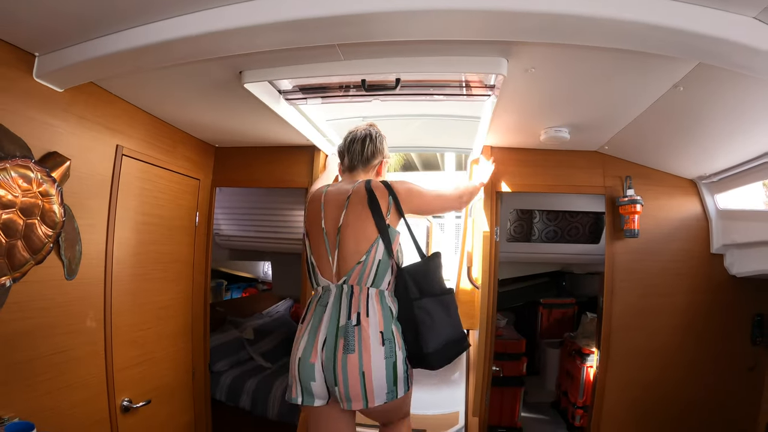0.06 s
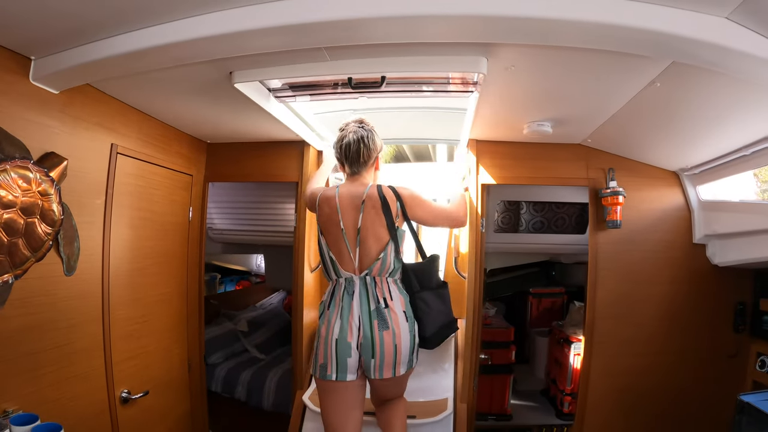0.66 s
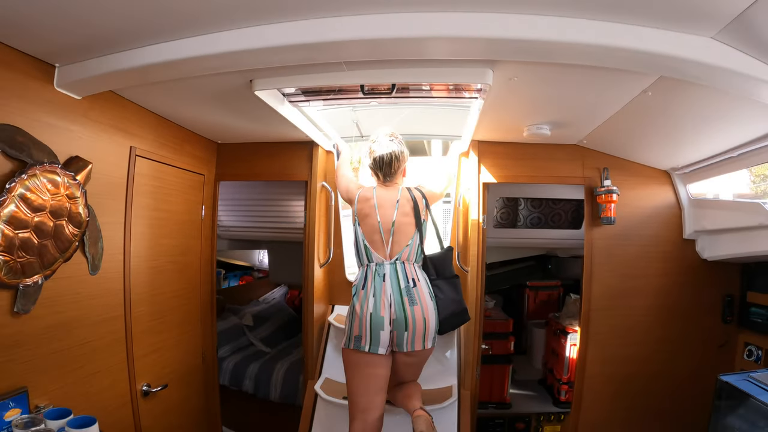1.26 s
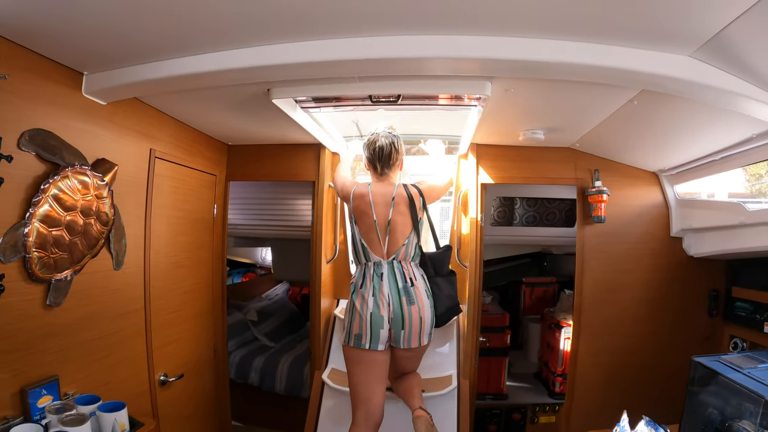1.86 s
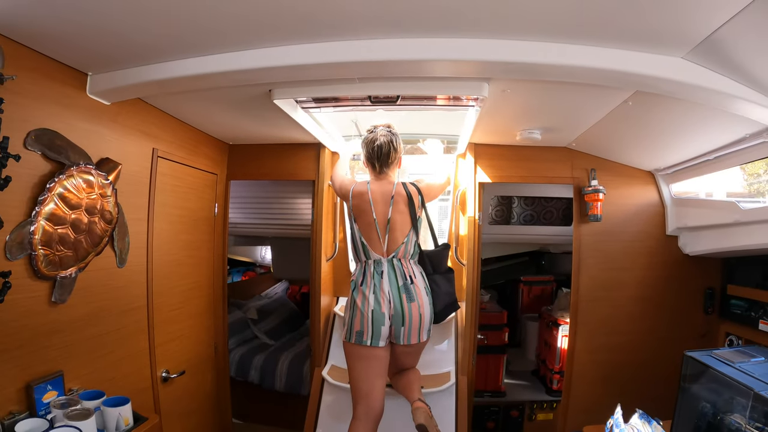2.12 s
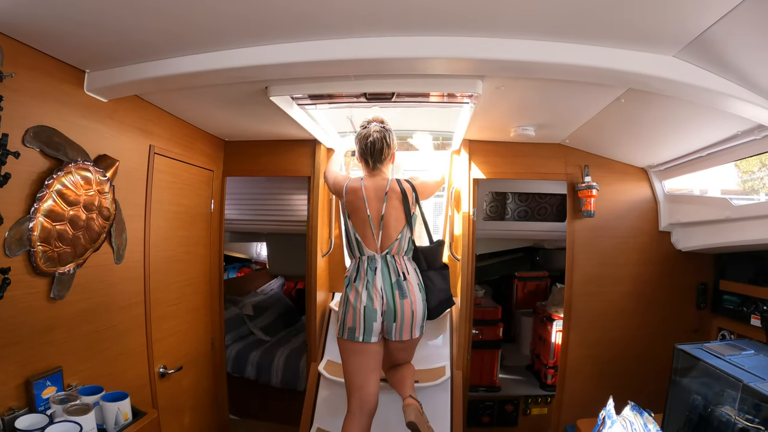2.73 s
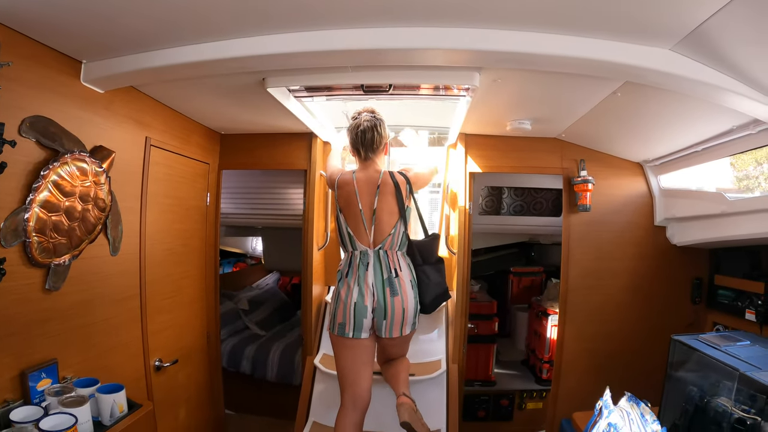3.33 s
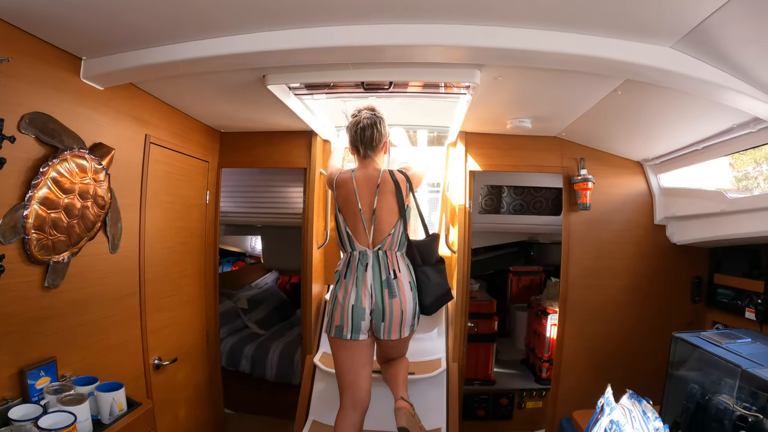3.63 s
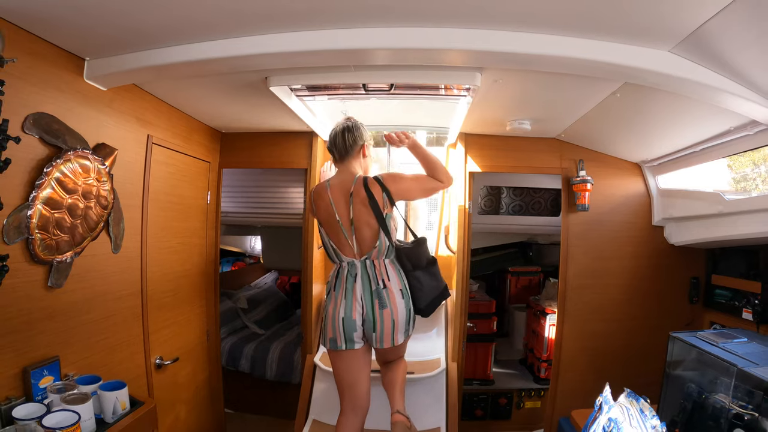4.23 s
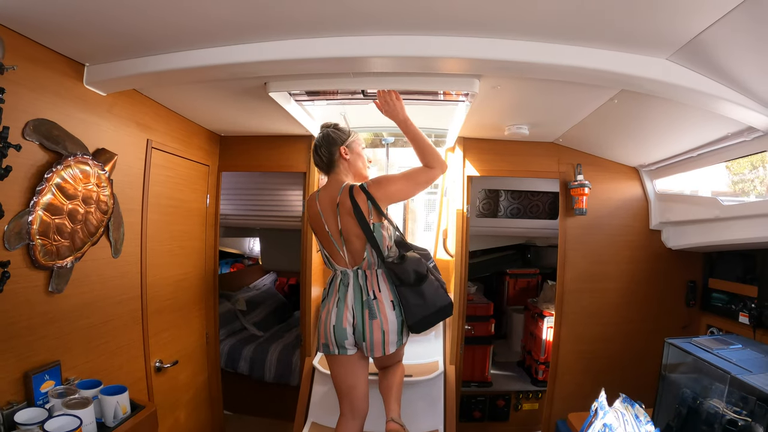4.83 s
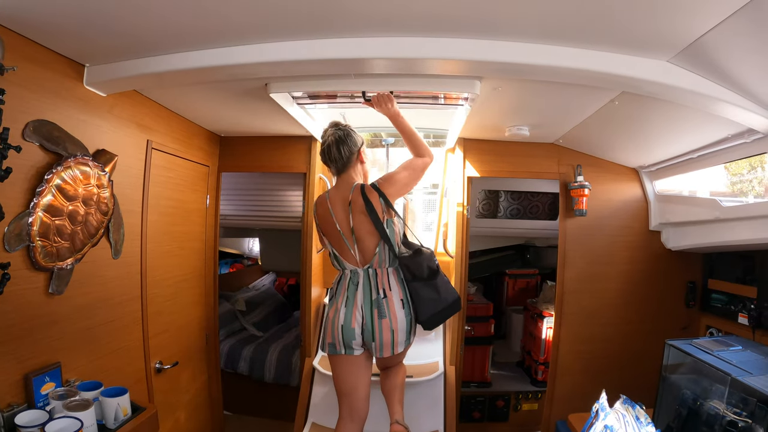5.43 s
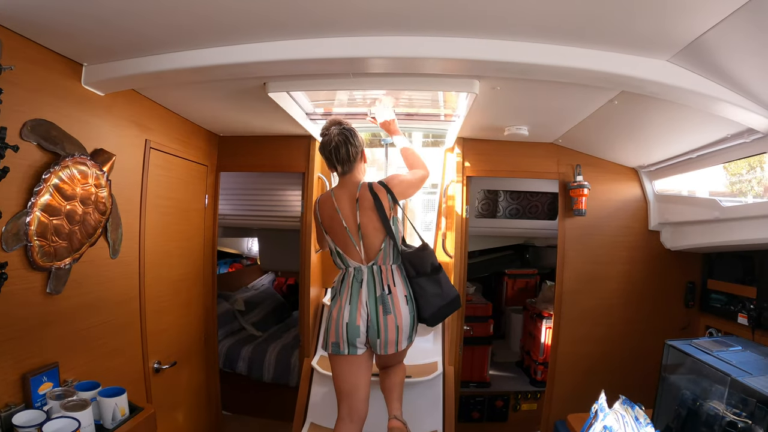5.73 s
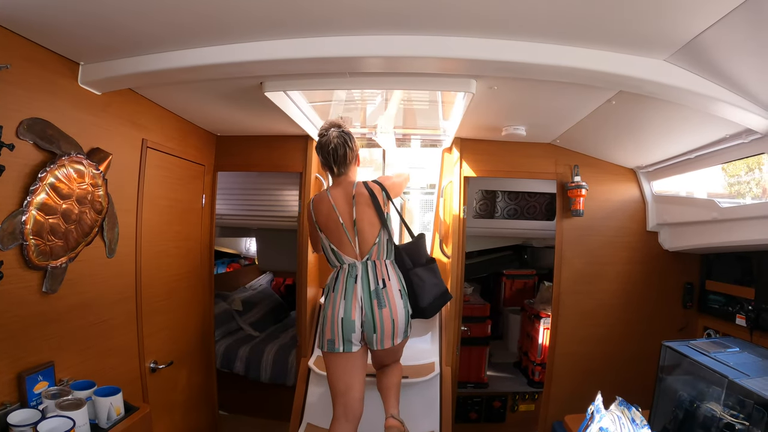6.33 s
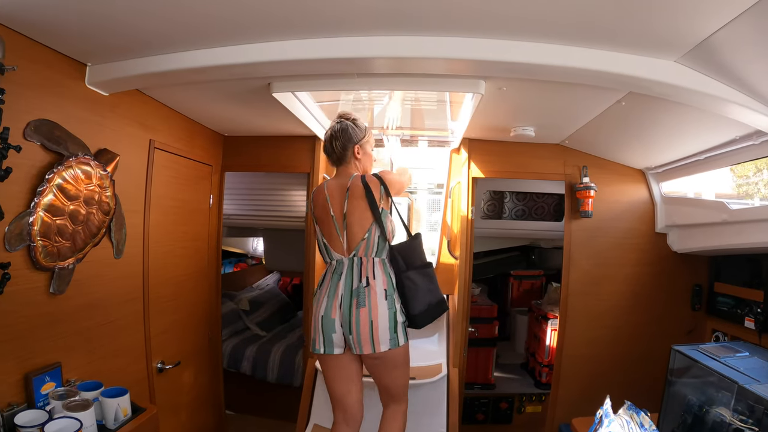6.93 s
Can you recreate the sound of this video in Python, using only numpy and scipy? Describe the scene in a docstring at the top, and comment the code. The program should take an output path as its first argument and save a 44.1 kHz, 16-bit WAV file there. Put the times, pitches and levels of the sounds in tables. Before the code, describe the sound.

Light clicks, a wooden knock and a rattling latch, then a sliding hatch bangs twice inside a small boat cabin.

```python
"""Steps and hatch in a sailboat cabin

One microphone inside a small wooden cabin, at close quarters. Someone climbs the companionway and works
the hatch overhead: steps tick, a board knocks, the latch clicks and rattles, and the sliding hatch bangs
twice against its stops. Every blow dies quickly in the cramped space, over a soft hollow drone that
the recorder's gain control turns down after each thump."""
import sys
import numpy as np
from scipy import signal
from scipy.fft import rfft, irfft, next_fast_len
from scipy.io import wavfile
from scipy.ndimage import uniform_filter1d, minimum_filter1d

SR = 44100
rng = np.random.default_rng(int(sys.argv[2]) if len(sys.argv) > 2 else 0)


def waveform_to_disk(signal):
    """Save audio, clipped to [-1, 1], as 16-bit WAV at the path in sys.argv[1]."""
    frames = np.transpose(np.atleast_2d(signal))
    scaled = np.clip(frames, -1, 1) * 32767
    samples = np.round(scaled).astype(np.int16)
    wavfile.write(sys.argv[1], SR, samples)


N = 307377
BLOW_S = .4   # length of one blow with its reflections

# spectrum of the board, scuffed or knocked: (frequency [Hz], level [dB])
BOARD_SPECTRUM = [(25, -31), (55, -20), (80, -7.5), (135, 4.5), (180, -3), (300, 0.5), (450, -4.5),
                  (750, -10), (950, -17.5), (1400, -15.5), (2900, -21.5), (4200, -32), (6000, -42.5),
                  (9500, -67), (13500, -73)]


def from_db(db):
    """Decibels to gain."""
    return 10 ** (np.asarray(db) / 20)


def unit_power(x):
    """Scale to a mean square of one."""
    return x / np.sqrt(np.mean(x ** 2) + 1e-20)


def at_level(sound, db):
    """Give a blow the energy of 30 ms at this level."""
    return from_db(db) * unit_power(sound) * np.sqrt(.03 / BLOW_S)


def at_hz(points, hz):
    """Read a table on a log-frequency axis."""
    frequencies, values = np.array(points).T
    return np.interp(np.log(hz + 1e-3), np.log(frequencies), values)


def add(track, s, sound):
    """Mix a sound in from time s."""
    start = round(s * SR)
    track[start:start + len(sound)] += sound[:N - start]


def low_cut(x, edge_hz, order=2):
    """Roll off the bass below the edge."""
    return signal.sosfilt(signal.butter(order, edge_hz, "high", fs=SR, output="sos"), x)


def coloured(x, spectrum, rings=(), tilt=0):
    """Filter by a body's smooth spectrum, a tilt in dB per octave and resonances that stand out."""
    size = 2 * next_fast_len(len(x) // 2 + 1)
    hz = np.arange(size // 2 + 1) * SR / size
    db = at_hz(spectrum, hz) + tilt * np.log2(np.clip(hz, 100, 6000) / 1000)
    for centre, width, lift in rings:
        db = db + lift / (1 + ((hz - centre) / width) ** 2)
    # minimum phase, so nothing rings before it is struck
    cepstrum = irfft(np.log(from_db(db)))
    cepstrum[1:size // 2] *= 2
    cepstrum[size // 2 + 1:] = 0
    return irfft(rfft(x, size) * np.exp(rfft(cepstrum)))[:len(x)]


def noise(spectrum, rings=(), tilt=0):
    """Steady unit-power noise through a body's spectrum and resonances."""
    return unit_power(coloured(rng.standard_normal(N), spectrum, rings, tilt))


def reflections():
    """Random reflections from one spot to the microphone, rippled by small resonances of the joinery."""
    spacing_hz = 69.8
    size = round(BLOW_S * SR)
    hz = np.arange(size // 2 + 1) / BLOW_S
    ripple = np.interp(hz / spacing_hz, np.arange(400), np.clip(rng.standard_normal(400), -2, 2))
    ripple_db = 2.5 * ripple * hz / (hz + 800)
    return irfft(rfft(rng.standard_normal(size)) * from_db(ripple_db), size)


def nearby(path, share=.65):
    """Repeated blows on one object have a share of their reflections in common."""
    return np.sqrt(share) * path + np.sqrt(1 - share) * reflections()


def impact(path, crack_db, crack_s, echo_db, decay_scale):
    """A blow at the microphone: the direct crack, a near wall's echo, then dense dying reflections."""
    # the cabin's decay, before decay_scale: (frequency [Hz], t60 [s])
    cabin_decay = [(60, 0.15), (200, 0.16), (600, 0.22), (2000, 0.2), (5000, .17), (12000, 0.13)]
    t = np.arange(len(path)) / SR
    hz = np.arange(len(t) // 2 + 1) * SR / len(t)
    since_echo = t - .0175
    crack = from_db(crack_db) * np.exp(-(t / crack_s) ** 2)
    echo = from_db(echo_db) * (since_echo > 0) * np.exp(-(since_echo / crack_s) ** 2)
    path_spectrum, out = rfft(path), 0
    edges = np.r_[20, np.geomspace(120, 15000, 12)]
    for low, high in zip(edges, edges[1:]):
        band = irfft(path_spectrum * (hz >= low) * (hz < high), len(t))
        t60 = decay_scale * at_hz(cabin_decay, np.sqrt(low * high))
        envelope = crack + echo + from_db(-60 * t / t60)
        out = out + np.sqrt(high - low) * unit_power(band * envelope)
    return out * (1 - np.exp(-t / .00047))


def struck(touches, spectrum, rings, high_hz, width_hz, crack_db, decay_scale):
    """A small part touches and rings briefly; each touch sets the strength of its high ring."""
    out, path = np.zeros(N), reflections()
    for s, db, lift_db, tilt in touches:
        hit = impact(nearby(path), crack_db, crack_s=.0032, echo_db=-21, decay_scale=decay_scale)
        ringing = coloured(hit, spectrum, rings + [(high_hz, width_hz, lift_db)], tilt)
        add(out, s, at_level(ringing, db))
    return out


def rebounds(blows, dulling, count):
    """Each blow becomes an even run of hits, each weaker and duller by `dulling` dB per octave."""
    return [(s + k * gap_s, db - k * loss_db, tilt - k * dulling)
            for s, db, tilt, gap_s, loss_db in blows for k in range(count)]


def panel(blows, spectrum, modes, modes_db, noise_db, decay_scale):
    """A heavy panel strikes and rebounds in step with its bending modes, so every blow feeds them."""
    # the thud gives way to the modes in the bass: (frequency [Hz], gain [dB])
    room_for_modes = [(100, -1), (160, -6), (600, -5), (2500, 0)]
    out, path = np.zeros(N), reflections()
    t = np.arange(len(path)) / SR
    onset = 1 - np.exp(-(t / .004) ** 2)
    first_s = blows[0][0]
    for s, db, tilt in blows:
        hit = impact(nearby(path), crack_db=-6.5, crack_s=.0043, echo_db=-18.5, decay_scale=decay_scale)
        thud = at_level(coloured(hit, spectrum, tilt=tilt), noise_db)
        sound = coloured(thud, room_for_modes)
        for k, (hz, mode_db, t60) in enumerate(modes):
            swing = np.sin(2 * np.pi * hz * (t + s - first_s)) * from_db(-60 * t / t60) * onset
            sound = sound + (-1) ** k * from_db(modes_db + mode_db + tilt * np.log2(hz / 600)) * swing
        add(out, s, from_db(db) * sound)
    return out


def drone():
    """Room tone: the steady, hollow background noise of the boat."""
    # broad shape of the drone: (frequency [Hz], level [dB])
    spectrum = [(25, -60), (64, -22), (102, -15), (130, -12), (200, -3.5), (300, -6.5), (370, -3),
                (510, -8), (740, -14), (950, -16.5), (2400, -23), (4800, -30.5), (6100, -38), (8000, -49.5),
                (9400, -65.5), (11200, -53), (14000, -68)]
    # its hollow resonances: (frequency [Hz], width [Hz], lift [dB])
    rings = [(130.5, 8.5, 10), (198.3, 4.3, 7), (275.8, 11.6, 11.5), (339, 8.2, 8), (451, 1.5, 11),
             (527.7, 7.6, 10), (692, 3.1, 15.5), (850, 3.2, 11), (1695, 5.8, 3.5), (4850, 130, 1)]
    return from_db(-46.4) * noise(spectrum, rings)


def woodwork_clicks():
    """Steps and hatch frame click drily, each spot with two rings of its own."""
    # clicks: (time [s], level [dB], main ring [Hz], second ring [Hz], its lift [dB], tilt [dB/octave])
    clicks = [(0.567, -49.5, 6140, 4170, 12, 4.5), (1.611, -58.5, 1300, 4160, 18, -1.5),
              (1.666, -50.5, 1240, 4170, 18, -3.5), (3.911, -45, 1535, 4100, 7, -6.5),
              (3.9924, -27.5, 1796, 4900, 2.5, -.5), (5.2007, -27, 3100, 4430, 12.5, -1),
              (5.2665, -45, 1300, 4500, 23, -5), (5.3054, -34.8, 3200, 4460, 8, 2.3)]
    # the woodwork's spectrum: (frequency [Hz], level [dB])
    spectrum = [(100, -25.5), (400, -15), (800, -1), (1500, 3.5), (2800, 0.5), (5200, -4.5), (6100, -13.5),
                (7300, -22), (8500, -39), (9400, -38), (10600, -30), (13000, -66)]
    out, main_lift_db = np.zeros(N), 12
    for s, db, main_hz, second_hz, second_lift_db, tilt in clicks:
        hit = impact(reflections(), crack_db=5, crack_s=.003, echo_db=-2.5, decay_scale=1)
        rings = [(main_hz, .055 * main_hz, main_lift_db), (second_hz, .058 * second_hz, second_lift_db)]
        add(out, s, at_level(coloured(hit, spectrum, rings, tilt), db))
    return out


def tread():
    """A companionway tread snaps under the foot, with a quick echo off the near wall."""
    # the snap and, last, its echo: (time [s], level [dB], high ring lift [dB], tilt [dB/octave])
    snap_and_echo = [(1.2898, -29.5, 3, 1.5), (1.2922, -39, 12, 0.5), (1.3078, -37.5, 8, 4.5)]
    # the tread's spectrum: (frequency [Hz], level [dB])
    spectrum = [(100, -30), (500, 4), (1100, 3.5), (1400, -8), (1700, -4), (2100, -0.5), (3200, -8),
                (5000, -2), (6200, -17), (8600, -30), (9400, -50), (10400, -47), (13000, -60)]
    # its resonances: (frequency [Hz], width [Hz], lift [dB])
    rings = [(1035, 73, 9), (1280, 100, 9), (2430, 140, 2.5), (4120, 130, 9), (7100, 140, 12)]
    return struck(snap_and_echo, spectrum, rings, high_hz=5300, width_hz=150, crack_db=6, decay_scale=.82)


def rustle():
    """Clothes and a bag brush faintly in short soft swells."""
    # swells: (peak time [s], level [dB], half length [s], tilt [dB/octave])
    swells = [(2.15, -71, .14, 6), (6.86, -64.5, .08, -1)]
    # the fabric's spectrum: (frequency [Hz], level [dB])
    spectrum = [(1000, -14), (3000, -7), (5600, 4), (9000, -19), (11500, -12), (14000, -32)]
    t, out = np.arange(N) / SR, 0
    for s, db, half_s, tilt in swells:
        out = out + from_db(db) * np.exp(-((t - s) / half_s) ** 2) * noise(spectrum, tilt=tilt)
    return out


def board_scuff():
    """A board takes hold and rubs harder and harder until it seats."""
    seat_s, rise_s, fall_db_per_s = 2.553, .024, 1700
    age = np.arange(N) / SR - seat_s
    pressure = np.clip(1 + age / rise_s, 0, 1) ** 1.5
    release = from_db(-fall_db_per_s * np.maximum(age, 0))
    return from_db(-21) * pressure * release * noise(BOARD_SPECTRUM, tilt=2.6)


def board_knock():
    """The board knocks home in two runs of rebounds."""
    # knocks: (time [s], level [dB], tilt [dB/octave], rebound gap [s], loss per rebound [dB])
    knocks = [(2.5510, -18.8, 2.3, .0174, 3.8), (2.559, -20.5, -1.5, .009, 3.5)]
    # the board's bending modes: (frequency [Hz], level [dB], t60 [s])
    modes = [(81, -5.5, 0.11), (136.2, 1, 0.095), (198.5, -9, 0.12), (245, -6.5, 0.11), (307, -8, 0.098),
             (458, -22, 0.11), (770, -9, 0.074), (1400, -20, 0.12), (1890, -16, 0.17)]
    hits = rebounds(knocks, dulling=.1, count=4)
    return panel(hits, BOARD_SPECTRUM, modes, modes_db=-3, noise_db=2.6, decay_scale=.85)


def hatch_slide():
    """Pushed overhead, the hatch gathers speed, runs and slows by friction; rumble and hiss follow."""
    # pushes: (start [s], time at full speed [s], rumble level [dB], hiss level [dB])
    pushes = [(3.29, 0.47, -42.5, -55), (5.15, .13, -38.5, -49.5)]
    # rumble of the moving hatch: (frequency [Hz], level [dB])
    rumble_spectrum = [(50, -30.5), (130, -5.5), (280, -3), (500, -8.5), (900, -18.5), (2000, -37),
                       (8000, -64)]
    # hiss of its rubbing: (frequency [Hz], level [dB])
    hiss_spectrum = [(200, -21), (800, -6.5), (2400, -1), (4000, -10.5), (6000, -19), (9000, -42.5),
                     (14000, -56)]
    rise_s, coast_db_per_s = .37, 19
    t, rumble_gain, hiss_gain = np.arange(N) / SR, 0, 0
    for s, run_s, rumble_db, hiss_db in pushes:
        coasting_s = np.maximum(t - s - rise_s - run_s, 0)
        speed = np.clip((t - s) / rise_s, 0, 1) * from_db(-coast_db_per_s * coasting_s)
        rumble_gain = rumble_gain + from_db(rumble_db) * speed
        hiss_gain = hiss_gain + from_db(hiss_db) * speed ** 1.15
    return rumble_gain * noise(rumble_spectrum) + hiss_gain * noise(hiss_spectrum)


def latch():
    """The latch ticks lightly and its spring rings."""
    # ticks: (time [s], level [dB], spring ring lift [dB], tilt [dB/octave])
    ticks = [(3.3005, -32.5, 10, 0.5), (3.309, -39.5, 9, -2), (3.383, -43.5, 16, -1.5), (3.609, -43, 3, -3),
             (3.652, -43, 16, -4.5), (6.081, -55, 22, 5)]
    # the latch's spectrum: (frequency [Hz], level [dB])
    spectrum = [(300, -16), (900, -3), (1500, -6), (4000, -1.5), (4650, -23), (5600, -5.5), (7500, -22.5),
                (9200, -40), (10500, -27), (12000, -34), (14000, -64)]
    # its resonances: (frequency [Hz], width [Hz], lift [dB])
    rings = [(1470, 99, 10), (2400, 250, 12), (3410, 430, 9), (3710, 310, 1)]
    return struck(ticks, spectrum, rings, high_hz=5320, width_hz=170, crack_db=-18, decay_scale=.96)


def bolt():
    """The bolt rattles through its guide: uneven touches swell quickly, then die away and grow duller."""
    # the bolt's spectrum: (frequency [Hz], level [dB])
    spectrum = [(120, -46), (400, -14), (1000, -1), (2000, -4.5), (3500, -1), (5000, -3), (6500, -13.5),
                (9500, -37), (11500, -29.5), (12800, -40), (14500, -71)]
    # its resonances: (frequency [Hz], width [Hz], lift [dB])
    rings = [(1010, 98, 14), (1775, 100, 10), (2040, 69, 11), (2530, 110, 10.5), (2900, 93, 9.5),
             (3610, 130, 7.5)]
    start_s, gap_s, count = 3.730, .008, 9
    peak_db, rise_db, rise_s, fall_db_per_s = -22.5, 10, .016, 330
    spring_db, tilt_per_s = 17, -65
    ages = gap_s * (np.arange(count) + rng.uniform(-.151, .1484, count))
    swell_db = -rise_db * np.maximum(1 - ages / rise_s, 0)
    levels_db = peak_db + swell_db - fall_db_per_s * np.maximum(ages - rise_s, 0)
    touches = [(start_s + age, db, spring_db, tilt_per_s * age) for age, db in zip(ages, levels_db)]
    return struck(touches, spectrum, rings, high_hz=4670, width_hz=190, crack_db=2, decay_scale=1.04)


def hatch_open():
    """The hatch grazes its open stop, hits it and falls back."""
    # blows: (time [s], level [dB], tilt [dB/octave], rebound gap [s], loss per rebound [dB])
    blows = [(5.4142, -16.5, 5.5, .012, 14), (5.4225, -6.5, 0, .0152, 7.5), (5.4735, -11.5, -.3, .0295, 5)]
    # thud against the stop: (frequency [Hz], level [dB])
    spectrum = [(25, -64), (55, -42), (90, -21.5), (160, -1.5), (240, -2), (400, -8.5), (520, -9.5),
                (700, -18.5), (1000, -28.5), (2000, -31), (2800, -40.5), (4100, -56.5), (5000, -70),
                (7000, -93), (12000, -100)]
    # the open hatch's bending modes: (frequency [Hz], level [dB], t60 [s])
    modes = [(158.8, 0.5, 0.25), (177.1, -6, 0.36), (237.8, 1, 0.099), (269.4, -3.5, 0.14),
             (406, -10.5, 0.17), (474.5, 3, 0.11), (497, -12.5, 0.19), (614, -17, 0.21), (719, -17, 0.14),
             (800, -27, 0.19), (1980, -16, 0.091), (2650, -25, 0.094)]
    hits = rebounds(blows, dulling=.1, count=3)
    return panel(hits, spectrum, modes, modes_db=-2.5, noise_db=1.5, decay_scale=1)


def hatch_slam():
    """The hatch slams with a few rebounds, and its ringing is cut off quickly at the end."""
    # blows: (time [s], level [dB], tilt [dB/octave], rebound gap [s], loss per rebound [dB])
    blows = [(6.1715, -28, 2, .012, 14), (6.1790, -8.2, 1.6, .0145, 3), (6.2385, -8.8, -.9, .0255, 6)]
    # thud of the slam: (frequency [Hz], level [dB])
    spectrum = [(25, -63.5), (55, -37), (85, -14), (120, -7), (160, -4.5), (290, -1), (365, -10), (520, -5),
                (720, -11.5), (1200, -16), (2600, -30), (3600, -38), (4600, -50.5), (6500, -55.5),
                (8500, -83), (13000, -82)]
    # the slammed hatch's bending modes: (frequency [Hz], level [dB], t60 [s])
    modes = [(95, -15, 0.19), (157.1, -4.5, 0.19), (233.5, -8.5, 0.26), (288.3, -9.5, 0.2),
             (311, -2.5, 0.16), (440, -3, 0.14), (495, 4.5, 0.13), (576, -12, 0.24), (652, -9, 0.14),
             (890, -11, 0.14), (990, -12.5, .18), (1130, -18, 0.18), (1380, -23, 0.24), (1552, -11.5, 0.09),
             (1750, -10, 0.1), (2140, -21, 0.097), (2622, -33, .16)]
    fade_start_s, fade_db_per_s = 6.31, 144
    hits = rebounds(blows, dulling=.6, count=4)
    bang = panel(hits, spectrum, modes, modes_db=-4, noise_db=4.5, decay_scale=.88)
    fading_s = np.clip(np.arange(N) / SR - fade_start_s, 0, .5)
    return bang * from_db(-fade_db_per_s * fading_s)


def loose_catch():
    """A loose catch jiggles after the bang and its spring rings."""
    # jiggles: (time [s], level [dB], spring ring lift [dB], tilt [dB/octave])
    jiggles = [(6.5572, -37.5, -6, 0), (6.578, -43, 3, -1), (6.6036, -38, 26, -3.5),
               (6.662, -49.5, 30, -5.5)]
    # the catch's spectrum: (frequency [Hz], level [dB])
    spectrum = [(300, -5.5), (1000, -5), (2000, -8.5), (3100, -2.5), (4100, -3.5), (4700, -20.5),
                (6600, -26), (9000, -52), (14000, -65)]
    # its resonances: (frequency [Hz], width [Hz], lift [dB])
    rings = [(1514, 145, 19.5), (3350, 340, 9), (3800, 150, 8)]
    return struck(jiggles, spectrum, rings, high_hz=5370, width_hz=230, crack_db=-9, decay_scale=.82)


def gain_control(x):
    """The recorder turns down when the bass grows loud, stays down a while and creeps back."""
    threshold_db, depth_db, attack_s, release_db_per_s = -28, 3.5, .078, 11.5
    bass = signal.sosfilt(signal.butter(2, 500, fs=SR, output="sos"), x)
    level_db = 10 * np.log10(np.abs(uniform_filter1d(bass ** 2, size=1300)) + 1e-12)
    recovery_db = release_db_per_s * np.arange(N) / SR
    held_db = np.maximum.accumulate(level_db + recovery_db, axis=-1) - recovery_db
    cut_db = np.clip(held_db - threshold_db, 0, depth_db)
    pole = np.exp(-1 / (attack_s * SR))
    return x * from_db(-signal.lfilter([1 - pole], [1, -pole], cut_db))


def scene():
    """All sources at one microphone in the cabin; bodies of limited size radiate no deep bass."""
    small_parts = tread() + latch() + loose_catch() + bolt()
    knock = board_knock()
    bangs = low_cut(hatch_open() + hatch_slam(), edge_hz=90)
    light_sounds = low_cut(small_parts + woodwork_clicks() + hatch_slide() + rustle(), edge_hz=112)
    scuff = low_cut(board_scuff(), edge_hz=260)
    return (light_sounds + scuff + knock + bangs + drone())[None]


def record(dry):
    """The recorder: gain control, a fast limiter at full scale, and cuts of the deepest bass and top."""
    levelled = gain_control(dry)
    allowed_gain = 1 / np.maximum(abs(levelled), 1)
    limiter_gain = uniform_filter1d(minimum_filter1d(allowed_gain, size=160), size=160)
    limited = low_cut(levelled * limiter_gain, edge_hz=25, order=1)
    top_cut = signal.cheby2(12, 60, 14500, fs=SR, output="sos")
    return signal.sosfilt(top_cut, np.clip(limited, -1, 1))


dry = scene()
out = record(dry)
waveform_to_disk(out)
```